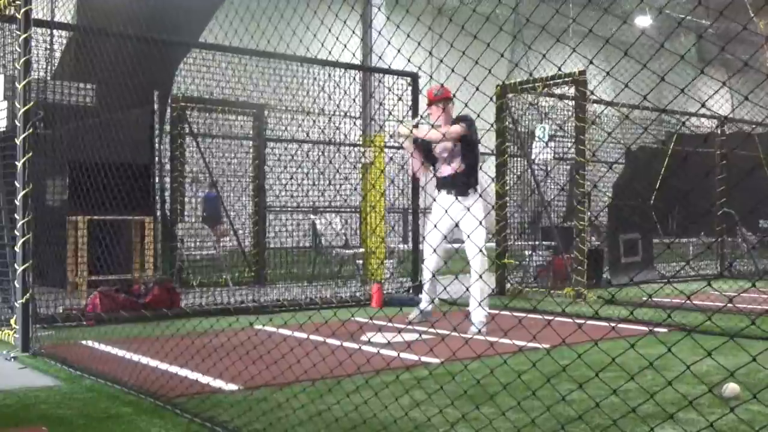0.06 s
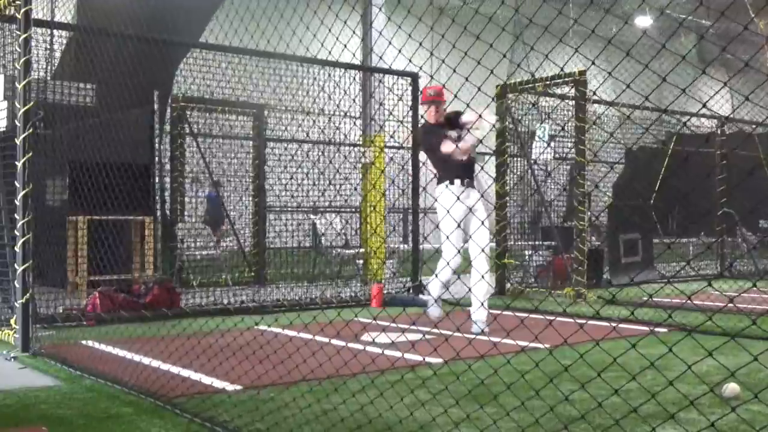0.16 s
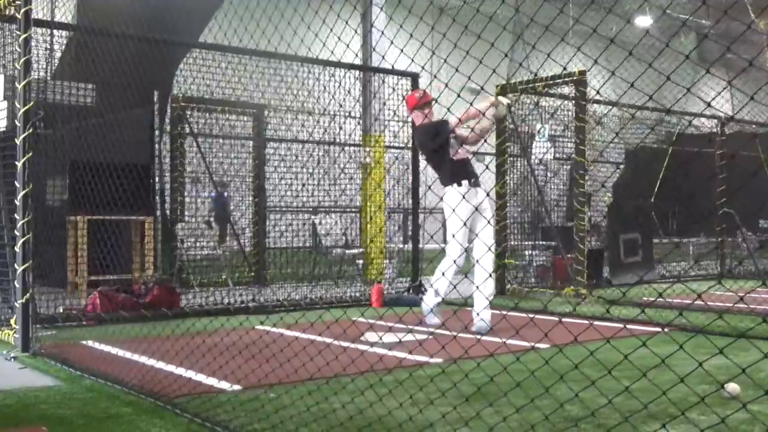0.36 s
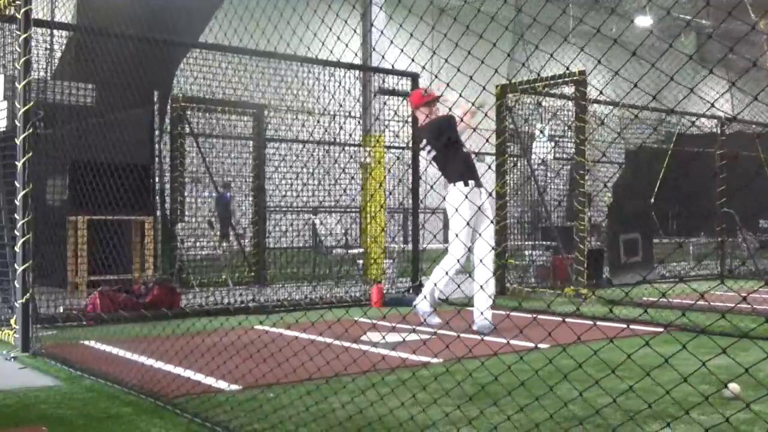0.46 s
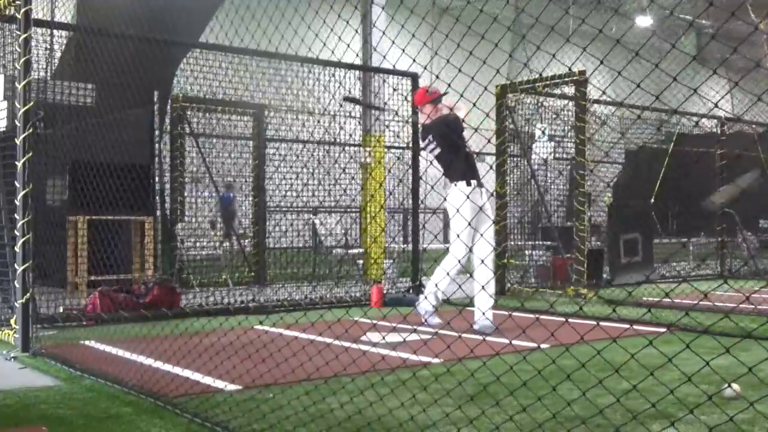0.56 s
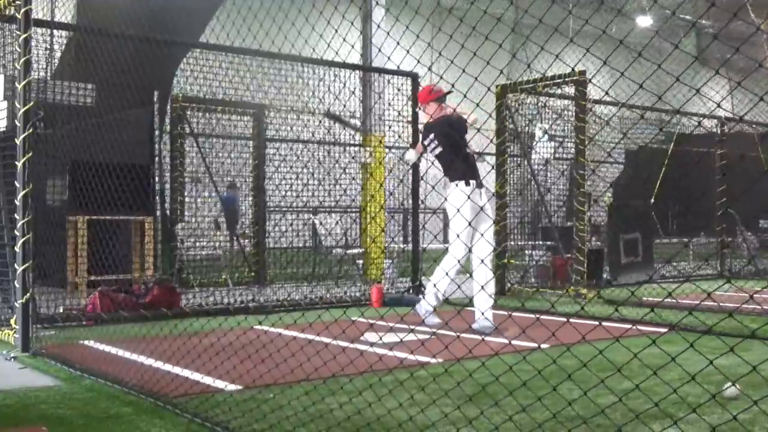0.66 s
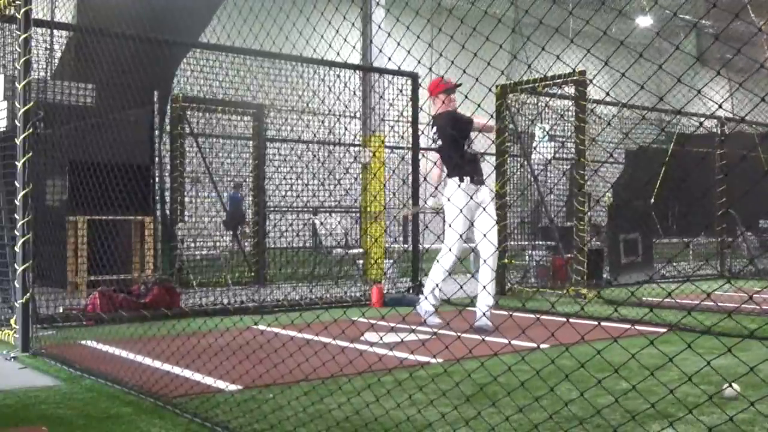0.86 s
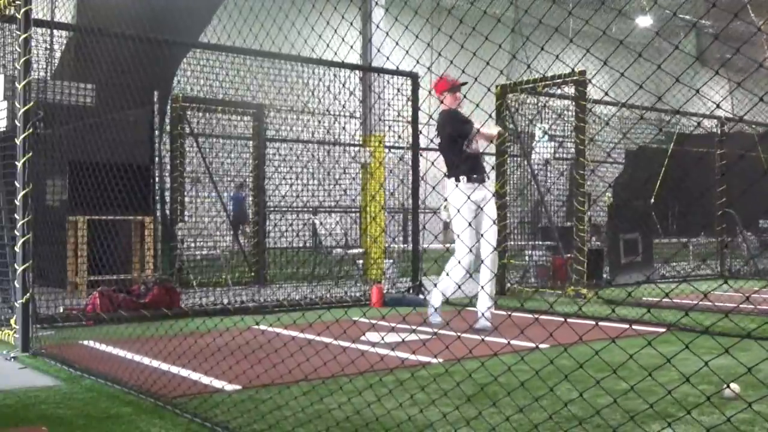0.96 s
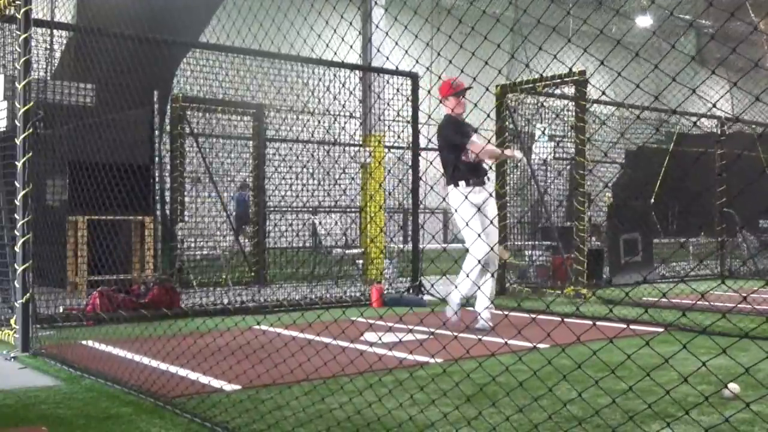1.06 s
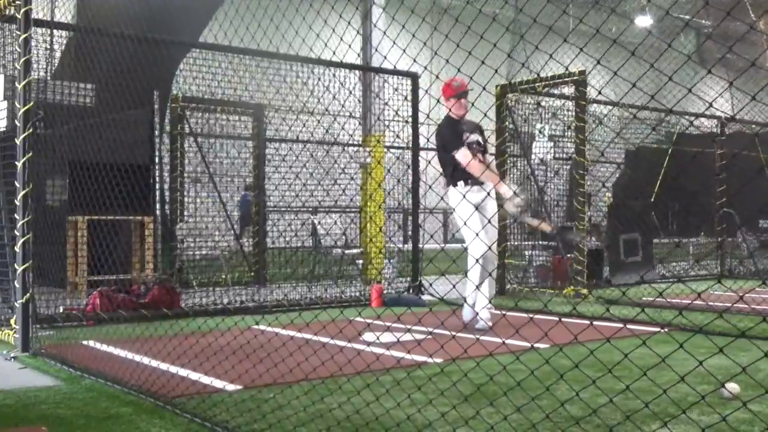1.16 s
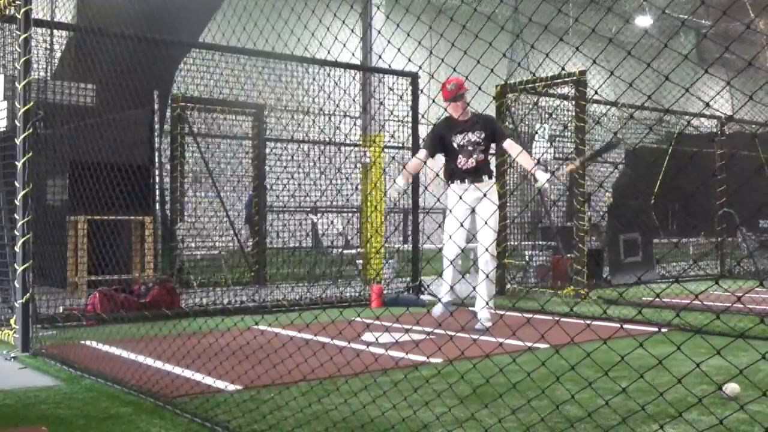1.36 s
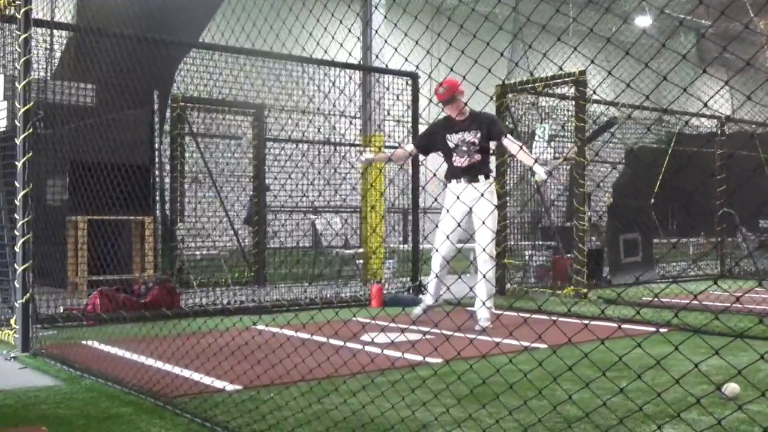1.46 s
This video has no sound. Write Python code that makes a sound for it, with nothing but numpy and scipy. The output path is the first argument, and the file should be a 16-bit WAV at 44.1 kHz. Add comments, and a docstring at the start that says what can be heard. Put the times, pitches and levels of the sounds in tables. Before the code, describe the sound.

Sharp crack of a bat hitting a ball, then a ringing net crash indoors.

```python
"""A brief rustle and swish, then a sharp crack: a bat meets a baseball in a big indoor batting cage.
The impact excites short wooden modes, and walls and roof reflect the crack. The ball crashes into the
net, which jangles, and its steel frame, whose modes ring through the hall; then it thuds on the turf.
The netting ticks as it settles, over humming ventilation that sinks away under the loud blows."""
import sys
import numpy as np
from scipy import signal
from scipy.fft import rfft, irfft, next_fast_len
from scipy.io import wavfile
from scipy.ndimage import map_coordinates

SR = 44100
rng = np.random.default_rng(int(sys.argv[2]) if len(sys.argv) > 2 else 0)


def materialize(psi):
    """Save the field psi as 16-bit PCM at rate SR to the path in sys.argv[1].

    A 1-D psi becomes a single channel; in a 2-D psi each row is a channel.
    """
    bounded = np.clip(np.atleast_2d(psi).T, -1, 1)
    quanta = np.round(bounded * 32767).astype(np.int16)
    wavfile.write(sys.argv[1], SR, quanta)


N = 66150
BAT_S, CRASH_S, THUD_S = .2422, .3978, .7858

# modes of bat and ball: (frequency [Hz], level [dB], T60 [s])
WOOD_MODES = [(1720, -14, 0.046), (2470, -15, 0.023), (3210, -14, 0.049), (4240, -1.5, 0.0067),
              (5640, -24, 0.011), (7520, -14, .01), (8900, -11, 0.0037)]
# spectrum of the contact snap: (frequency [Hz], relative level [dB])
SNAP_SPECTRUM = [(200, -22), (900, -7), (4200, 0), (6000, 1), (9500, -1), (12000, -13), (16000, -24)]
# direct path and early reflections of the crack: (delay [s], gain [dB])
CRACK_PATHS = [(0, 0.5), (.001, -7), (.005, -14), (.0133, -16), (.0248, -21), (.033, -9), (0.042, -7)]
# envelope of the crack's reverberation: (time [s], level [dB])
CRACK_HALL_ENVELOPE = [(.241, -42), (.244, -9.5), (.259, -1), (.264, -12), (.27, -1.5), (.286, 1),
                       (.335, 1), (.37, 1), (.392, 5.5), (.396, -13), (.42, -26), (.5, -70)]
# its spectrum: (frequency [Hz], density level [dB])
CRACK_HALL_SPECTRUM = [(100, -63), (220, -65), (330, -62.5), (480, -55.5), (730, -54.5), (950, -49),
                       (1600, -47.5), (3100, -47.5), (4000, -54), (5500, -56), (7200, -63.5), (10000, -59),
                       (13000, -70), (16000, -98)]
# its absorption: (frequency [Hz], extra decay [dB/s])
CRACK_HALL_LOSS = [(1000, 20), (3000, 7), (6000, 19), (11000, 130)]

# bright jangle of the net: (frequency [Hz], density level [dB])
JANGLE_SPECTRUM = [(120, -86), (280, -61.5), (450, -63.5), (660, -47.5), (780, -56.5), (900, -47.5),
                   (1200, -56), (3200, -81), (4300, -61), (6500, -66), (9000, -58.5), (11000, -58),
                   (13500, -65.5), (16000, -74)]
# steel frame modes as they ring in the hall: (frequency [Hz], relative level [dB], bandwidth [Hz])
FRAME_MODES = [(612, -10, 24), (655, -11, 26), (882, 0, 22), (922, -6, 20), (1072, -3, 18), (1230, -7, 20),
               (1385, 1, 9), (1445, -2, 18), (1590, -5, 20), (1893, 0, 16), (1988, 1, 12), (2126, -4, 14),
               (2355, 1, 22), (2442, 0, 9), (2527, 1, 9), (2945, 1, 26), (3191, -5, 10), (3315, -4, 10),
               (3500, -4, 24), (3979, 1, 12), (4044, 4, 18), (4095, 3, 24), (4185, 5, 16), (4260, 1, 24)]
# their damping beyond the hall's envelope: (frequency [Hz], extra decay [dB/s])
FRAME_DAMPING = [(630, -6), (900, 1.5), (1400, -3.5), (2400, 6.5), (3200, 8), (4100, 8.5)]
# envelope of the crash's reverberation: (time [s], level [dB])
CRASH_HALL_ENVELOPE = [(.396, -53), (.4, -10.5), (.44, -4), (.52, -1), (.6, -1), (.7, -2), (.8, -6.5),
                       (.92, -9.5), (1.06, -12), (1.12, -14), (1.3, -16.5), (1.5, -19)]
# its spectrum: (frequency [Hz], density level [dB])
CRASH_HALL_SPECTRUM = [(150, -72), (400, -74.5), (520, -62.5), (620, -53.5), (760, -61.5), (900, -55),
                       (1400, -49.5), (2300, -46), (3400, -51), (4300, -44), (5200, -49.5), (6500, -55),
                       (9000, -57.5), (12000, -69), (16000, -93)]
# its absorption, negative where a band lingers: (frequency [Hz], extra decay [dB/s])
CRASH_HALL_LOSS = [(600, -7.5), (1200, -1.5), (2200, 5), (3200, 8), (4300, 14.5), (5800, 26.5),
                   (8500, 40.5), (13000, 41)]

# modes of the ball on turf: (frequency [Hz], level [dB], T60 [s])
TURF_MODES = [(202, -31, 0.031), (314, -1, 0.013), (450, -6.5, 0.0084), (806, -12, 0.016)]
# low echo of the thud: (frequency [Hz], relative level [dB])
THUD_ECHO_SPECTRUM = [(60, -35), (170, -6.5), (350, -0.5), (600, -7), (1500, -32), (4000, -70)]

# impacts of net fittings: (time [s], level [dB], attack [s], T60 [s], spectral tilt [dB/octave])
FITTING_IMPACTS = [(.785, -32, .0004, .05, 10), (.818, -35.5, .001, .08, 15),
                   (0.877, -31.5, .0005, 0.062, 11), (.911, -35, .001, 0.079, 6),
                   (1.025, -47, .001, .12, 7), (1.078, -41, .001, 0.043, 0),
                   (1.181, -35.5, .0003, 0.061, -3), (1.2615, -31, .0004, .05, -4),
                   (1.2747, -30, .0003, 0.021, -4), (1.379, -21.5, 0.00053, 0.015, -5.5)]
# click of a fitting before tilting: (frequency [Hz], relative level [dB])
CLICK_SPECTRUM = [(300, -26), (1500, -7), (3600, -5), (5500, -2), (9500, -2), (12500, -17), (16000, -28)]
# modes of a fitting: (frequency [Hz], level relative to the click [dB], T60 [s])
FITTING_MODES = [(3450, -1, .025), (5060, -2, 0.02), (6140, -6, .02), (9500, -11, .015)]

# rustles of clothing in the swing: (time [s], level [dB], rise and fall time constant [s])
CLOTH_RUSTLES = [(.075, -41, 0.014), (.12, -42.5, 0.011), (.19, -40, 0.022), (.233, -36, .004)]
# their spectrum: (frequency [Hz], relative level [dB])
CLOTH_SPECTRUM = [(300, -15), (1500, -2.5), (3600, 2), (6500, -7), (10000, -6.5), (15000, -22)]
# air rushing round the bat: (frequency [Hz], relative level [dB])
SWISH_SPECTRUM = [(100, -10), (500, -6), (1200, 4), (3000, -24), (9000, -14), (16000, -27)]

# rumble of the ventilation: (frequency [Hz], relative level [dB])
VENT_SPECTRUM = [(15, -35), (25, -4.5), (120, -5), (170, -12.5), (236, -8.5), (270, -15.5), (476, -16.5),
                 (545, -25.5), (714, -18.5), (863, -24), (9840, -43), (16000, -46)]
# its hum tones: (frequency [Hz], level before the envelope [dB])
VENT_TONES = [(89, -42), (119.7, -40.5), (239.5, -44), (358, -55)]
# envelope of rumble and hum: (time [s], level [dB])
VENT_ENVELOPE = [(0, 1.5), (.235, 2.5), (.25, -37), (.39, -26), (.405, -29), (.55, -16.5), (.8, -13.5),
                 (1.1, -8.5), (1.3, -6.5), (1.5, -9)]
# coherence of the hall's diffuse field: (frequency [Hz], left-right correlation [ratio])
HALL_COHERENCE = [(150, 1), (300, 0.98), (550, 0.92), (1000, 0.71), (5000, 0.7), (8000, 0.87), (12000, 1)]


def bat_crack(snap_db=-7, snap_t60_s=.0064):
    """Impact excitation: a snap and damped wooden modes arrive directly, by reflection and diffusely."""
    reverberation = absorb(diffuse_noise(CRACK_HALL_SPECTRUM), CRACK_HALL_LOSS, BAT_S)
    sound = reverberation * envelope(CRACK_HALL_ENVELOPE)
    for delay_s, db in CRACK_PATHS:
        t = since(BAT_S + delay_s)
        snap = amp(snap_db) * unit_noise(SNAP_SPECTRUM) * (t > 0) * decay(t, snap_t60_s)
        sound += amp(db) * (damped_modes(WOOD_MODES, t) + snap)
    return sound


def net_jangle(rise_s=.069, rise_db=1, t60_s=.36):
    """Dense vibrations of the struck net merge into bright noise that swells slightly, then decays."""
    t = since(CRASH_S)
    rise = (t > 0) * amp(rise_db * np.minimum(t / rise_s - 1, 0))
    return diffuse_noise(JANGLE_SPECTRUM) * rise * decay(since(CRASH_S + rise_s), t60_s)


def frame_clang(db_at_1khz=-34, tilt_db_per_octave=-3, t60_s=.2):
    """Free vibration: the inharmonic modes of the struck steel frame, heard by the direct path."""
    modes = [(hz, db_at_1khz + tilt_db_per_octave * np.log2(hz / 1000), t60_s)
             for hz, _, _ in FRAME_MODES]
    return damped_modes(modes, since(CRASH_S), scatter_turns=.96)


def crash_reverberation(ring_db=-31):
    """Repeated reflection draws the crash into a noise tail, with a narrow band for each frame mode."""
    t = since(CRASH_S)
    hall = absorb(diffuse_noise(CRASH_HALL_SPECTRUM), CRASH_HALL_LOSS, CRASH_S)
    for hz, db, width_hz in FRAME_MODES:
        bands = [narrowband_noise(hz, width_hz, t) for _ in range(2)]
        gain = amp(ring_db + db - at_frequency(FRAME_DAMPING, hz) * t)
        hall += gain * stereo_field(bands, hz)
    return hall * envelope(CRASH_HALL_ENVELOPE)


def turf_thud(attack_s=.00082, echo_db=-27.5, echo_t60_s=.42, low_cut_hz=150):
    """Heavy damping: the ball lands on turf with a dead knock and a low echo, without deep bass."""
    t = since(THUD_S)
    echo = amp(echo_db) * unit_noise(THUD_ECHO_SPECTRUM) * decay(t, echo_t60_s)
    knock = (damped_modes(TURF_MODES, t) + echo) * (1 - np.exp(-t / attack_s))
    highpass = signal.butter(3, low_cut_hz, 'highpass', fs=SR, output='sos')
    return signal.sosfilt(highpass, knock)


def net_ticks(pivot_hz=6000, echo_db=-8.5, echo_t60_s=.72):
    """Small impacts excite the fittings of the swinging net: a click, a brief ring and a faint echo."""
    sound = np.zeros((2, N))
    for start_s, db, attack_s, t60_s, tilt in FITTING_IMPACTS:
        t = since(start_s)
        spectrum = [(hz, band_db + tilt * np.log2(hz / pivot_hz)) for hz, band_db in CLICK_SPECTRUM]
        # the square root makes echo_db a ratio of energies, echo to click
        tail = amp(echo_db) * np.sqrt(t60_s / echo_t60_s) * decay(t, echo_t60_s)
        click = unit_noise(spectrum) * (decay(t, t60_s) + tail)
        ring = damped_modes(FITTING_MODES, t, scatter_turns=1)
        sound += amp(db) * (click + ring) * (1 - np.exp(-t / attack_s))
    return sound


def swing(swish_s=.233, swish_width_s=.005, swish_db=-28.5):
    """Friction and flow noise: clothes rustle, then air rushes round the bat just before contact."""
    t = since(0)
    rustles = sum(amp(db) * np.exp(-np.abs(t - s) / width_s) for s, db, width_s in CLOTH_RUSTLES)
    swish = amp(swish_db) * np.exp(-np.abs(t - swish_s) / swish_width_s)
    return rustles * unit_noise(CLOTH_SPECTRUM) + swish * unit_noise(SWISH_SPECTRUM)


def ventilation(rumble_db=-35.5, waver_rad=.14, waver_hz=8):
    """Broadband rumble and tonal hum superpose; their level dips at crack and crash, then creeps back."""
    hum = np.zeros(N)
    for hz, db in VENT_TONES:
        phase = 2 * np.pi * (hz * since(0) + rng.random()) + waver_rad * smooth_random(waver_hz)
        hum += amp(db) * np.sqrt(2) * np.sin(phase)
    rumble = amp(rumble_db) * unit_noise(VENT_SPECTRUM)
    return (rumble + hum) * envelope(VENT_ENVELOPE)


def damped_modes(modes, t, scatter_turns=0):
    """Modal superposition: decaying sinusoids start at t = 0, their phases optionally scattered."""
    return (t > 0) * sum(
        amp(db) * np.sin(2 * np.pi * (hz * t + scatter_turns * rng.random())) * decay(t, t60_s)
        for hz, db, t60_s in modes)


def absorb(x, loss, start_s):
    """Absorption by air and walls: from start_s on, each frequency decays at its own rate."""
    hz, t, spectra = signal.stft(x, SR, nperseg=512)
    gain = amp(-at_frequency(loss, hz)[:, None] * np.maximum(t - start_s, 0))
    return signal.istft(spectra * gain, SR, nperseg=512)[1][:, :N]


def stereo_field(pair, hz):
    """Partial coherence: two independent signals mix to the hall's left-right correlation at hz."""
    angle = np.arccos(np.clip(at_frequency(HALL_COHERENCE, hz), -1, 1)) / 2
    mid, side = pair[0] * np.cos(angle), pair[1] * np.sin(angle)
    return np.array([mid + side, mid - side])


def diffuse_noise(spectrum):
    """A diffuse field: stereo noise with the given power spectral density."""
    hz = np.fft.rfftfreq(N, 1 / SR)
    white = stereo_field(rfft(rng.standard_normal((2, N))), hz)
    return irfft(white * amp(at_frequency(spectrum, hz)), N) * np.sqrt(SR / 2)


def unit_noise(spectrum):
    """Diffuse noise of the given spectral shape at unit rms."""
    return unit_rms(diffuse_noise(spectrum))


def narrowband_noise(hz, width_hz, t):
    """Random modulation of amplitude and phase broadens a tone into a band about width_hz wide."""
    modulation = smooth_random(width_hz) + 1j * smooth_random(width_hz)
    return unit_rms(np.real(modulation * np.exp(2j * np.pi * hz * t)))


def smooth_random(rate_hz):
    """A spline through rate_hz random values a second."""
    return map_coordinates(rng.standard_normal(256), [since(0) * rate_hz + 2], mode='wrap')


def decay(t, t60_s):
    """Exponential decay, 60 dB in t60_s."""
    return np.exp(-np.log(1000) * t / t60_s)


def envelope(points):
    """Gain per sample from (time [s], level [dB]) points."""
    return amp(np.interp(since(0), *np.transpose(points)))


def at_frequency(points, hz):
    """Interpolation of (frequency [Hz], value) points on a logarithmic frequency axis."""
    frequencies, values = np.transpose(points)
    return np.interp(np.log(hz + 1), np.log(frequencies + 1), values)


def since(start_s):
    """Seconds elapsed since start_s, zero before it."""
    return np.maximum(np.arange(N) / SR - start_s, 0)


def unit_rms(x):
    """Normalisation to an rms of 1."""
    return x / np.sqrt(np.mean(x ** 2) + 1e-20)


def amp(db):
    """Decibels to amplitude ratio."""
    return 10 ** (np.asarray(db) / 20)


def scene():
    """Linear superposition: swing, crack, crash, thud and settling net add over the ventilation."""
    return (ventilation() + swing() + bat_crack()
            + net_jangle() + frame_clang() + crash_reverberation()
            + turf_thud() + net_ticks())


def record(dry):
    """Soft saturation rounds the highest peaks; a low-pass filter softens and band-limits the treble."""
    ceiling, roll_off_hz, band_limit_hz = .94, 14900, 15800
    rounded = dry / (1 + np.abs(dry / ceiling) ** 8) ** (1 / 8)
    size = next_fast_len(N + SR // 2)
    hz = np.fft.rfftfreq(size, 1 / SR)
    lowpass = (hz < band_limit_hz) / np.sqrt(1 + (hz / roll_off_hz) ** 32)
    return irfft(rfft(rounded, size) * lowpass, size)[..., :N]


dry = scene()
out = record(dry)
materialize(out)
```